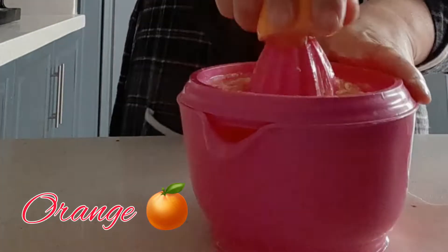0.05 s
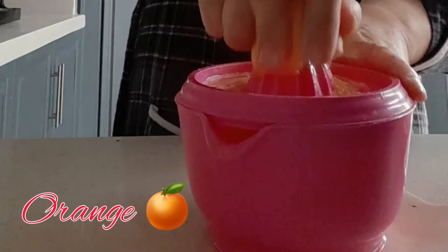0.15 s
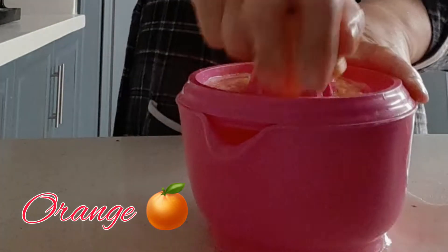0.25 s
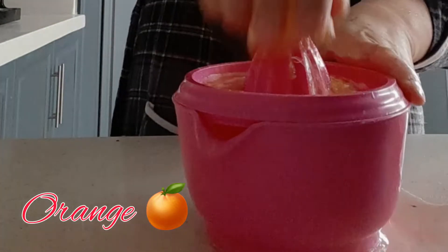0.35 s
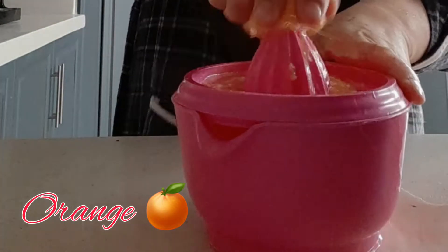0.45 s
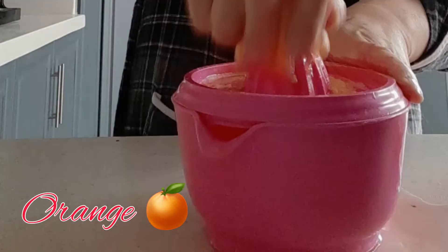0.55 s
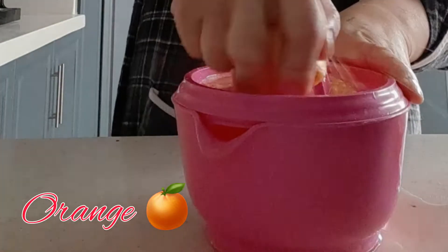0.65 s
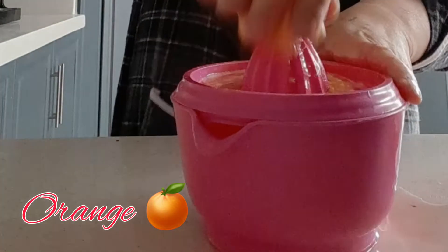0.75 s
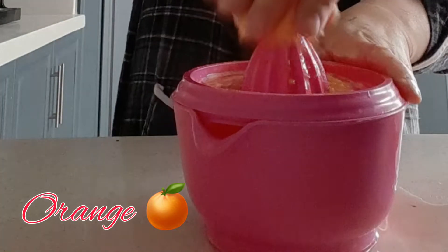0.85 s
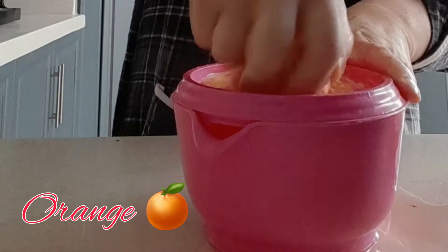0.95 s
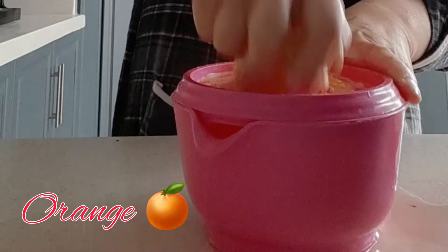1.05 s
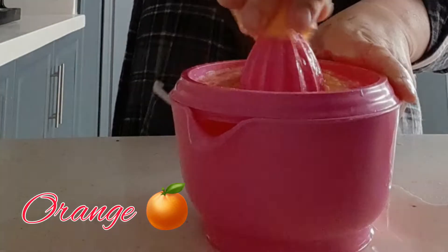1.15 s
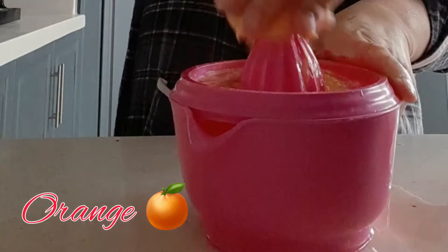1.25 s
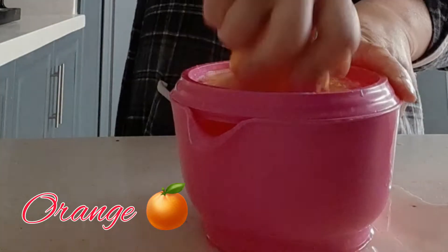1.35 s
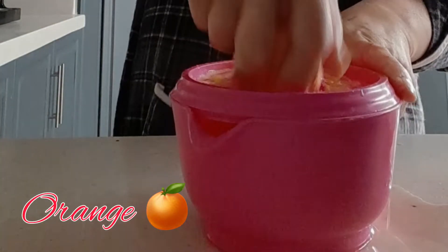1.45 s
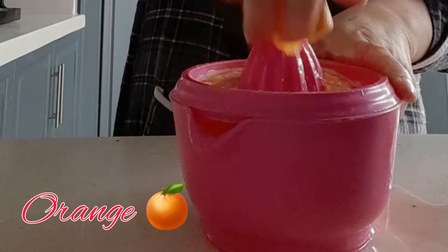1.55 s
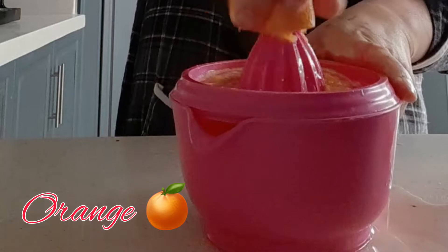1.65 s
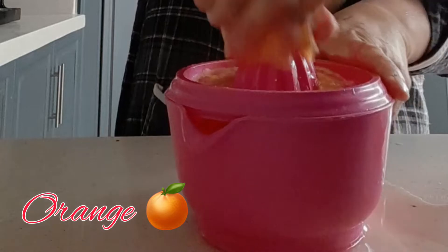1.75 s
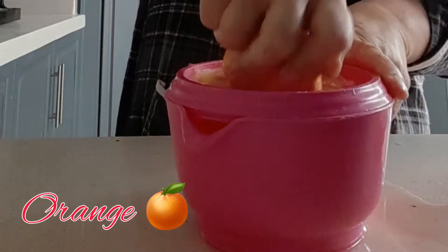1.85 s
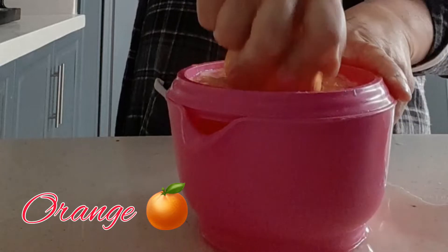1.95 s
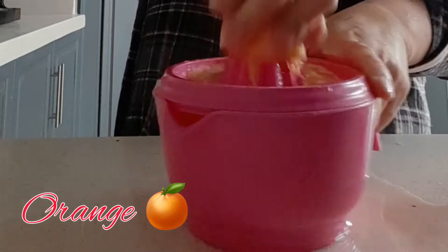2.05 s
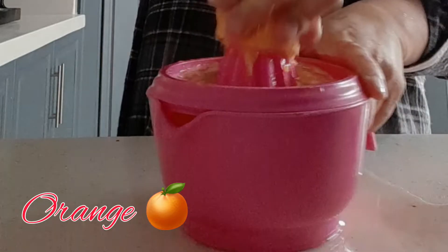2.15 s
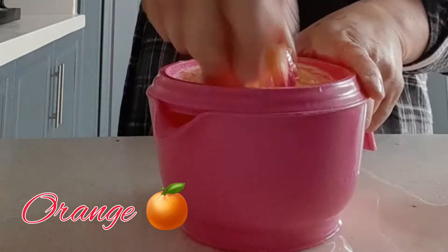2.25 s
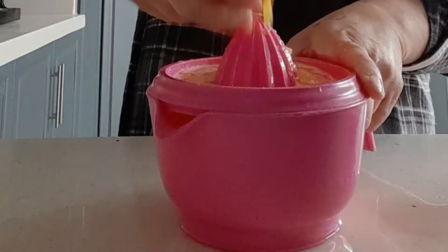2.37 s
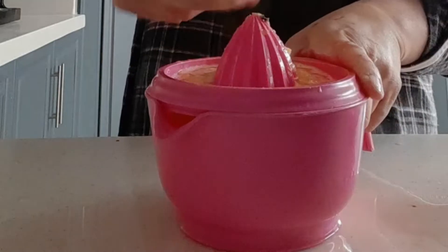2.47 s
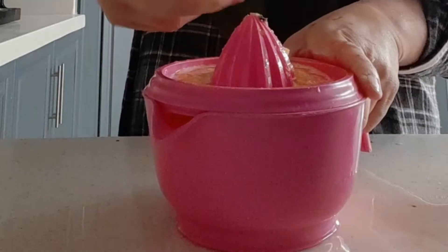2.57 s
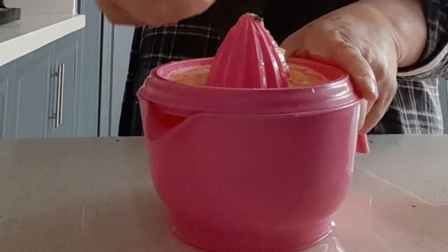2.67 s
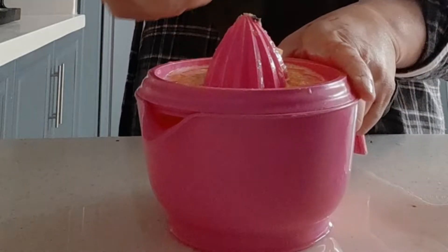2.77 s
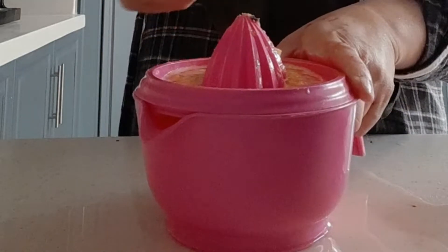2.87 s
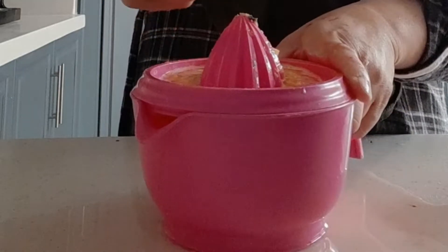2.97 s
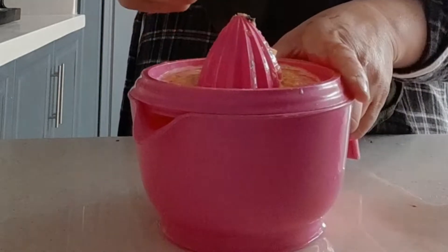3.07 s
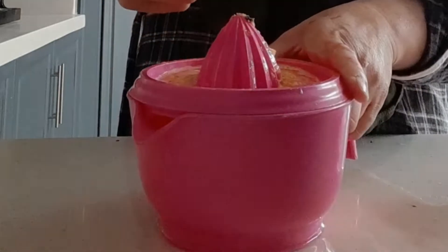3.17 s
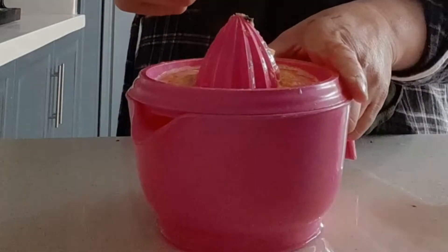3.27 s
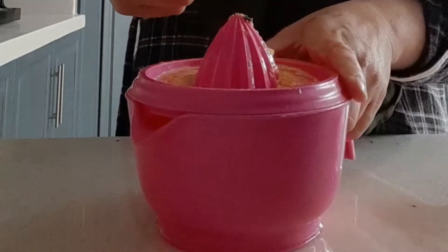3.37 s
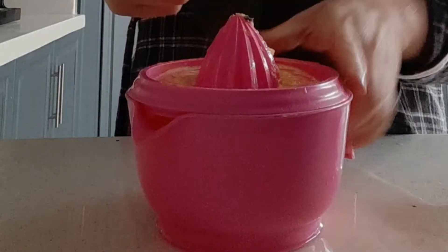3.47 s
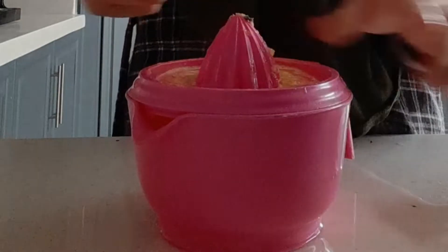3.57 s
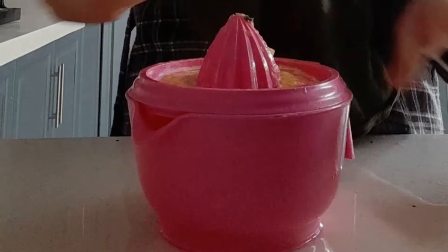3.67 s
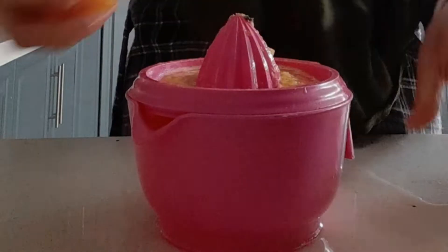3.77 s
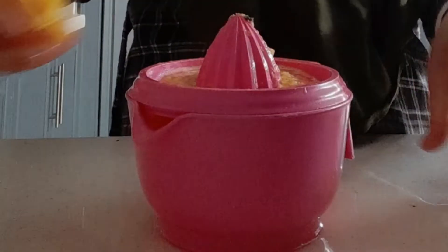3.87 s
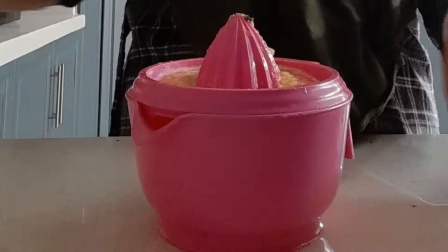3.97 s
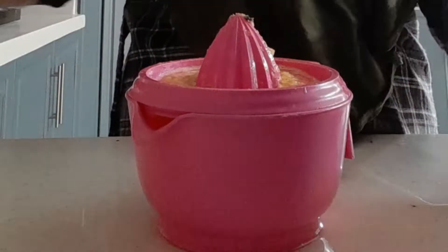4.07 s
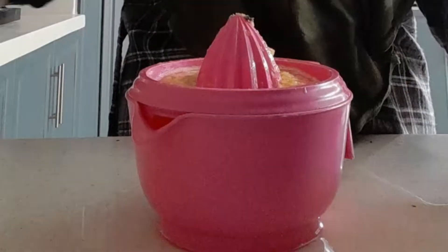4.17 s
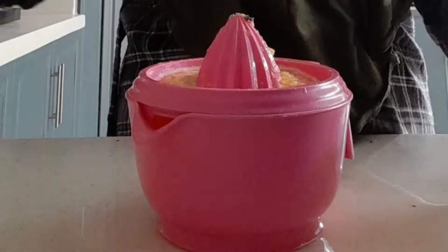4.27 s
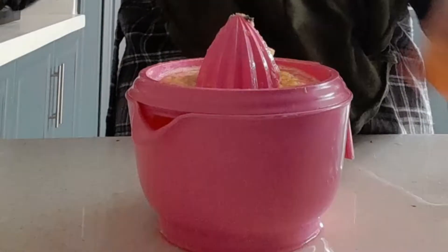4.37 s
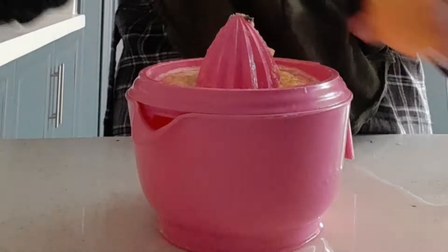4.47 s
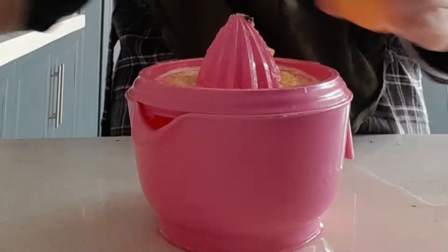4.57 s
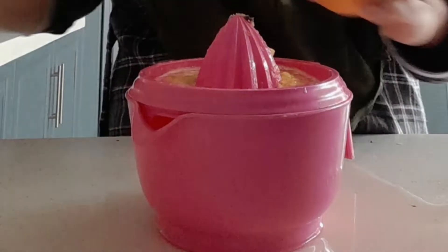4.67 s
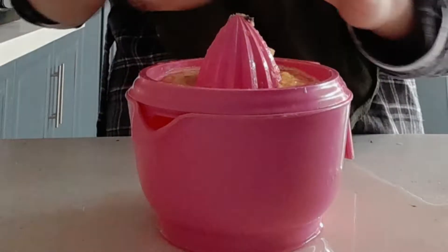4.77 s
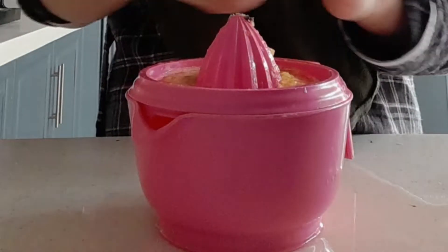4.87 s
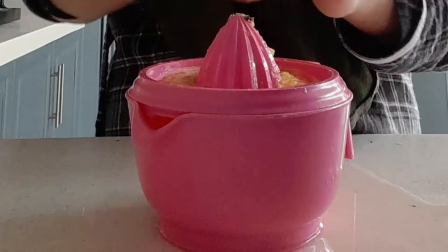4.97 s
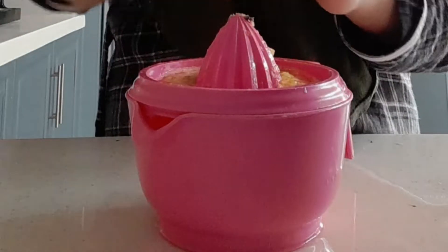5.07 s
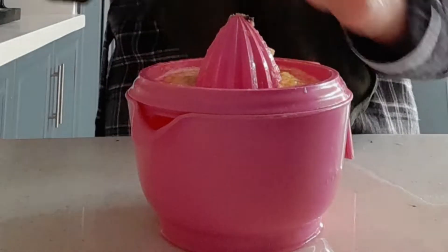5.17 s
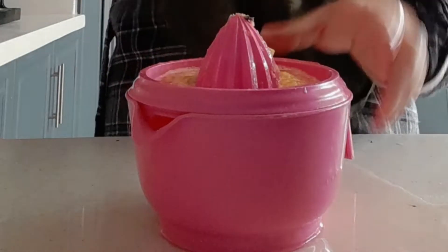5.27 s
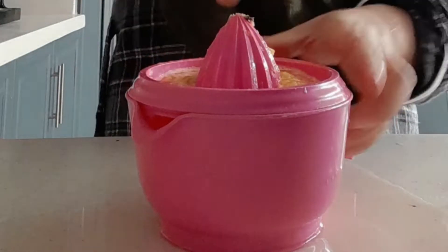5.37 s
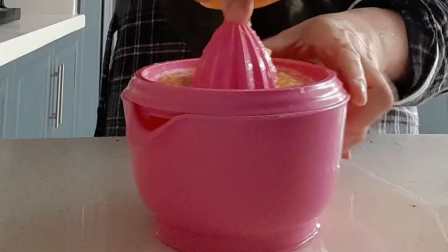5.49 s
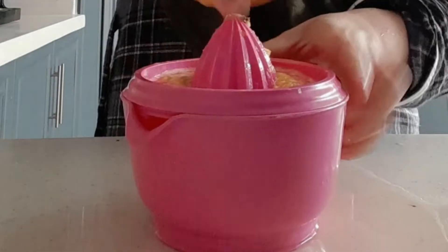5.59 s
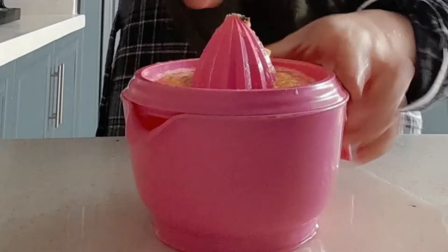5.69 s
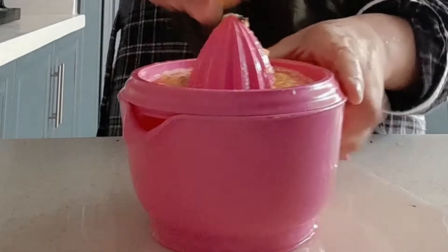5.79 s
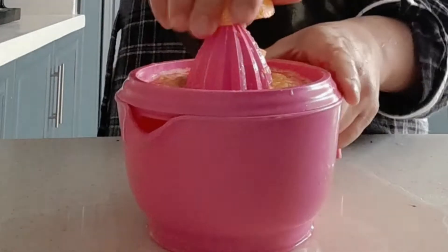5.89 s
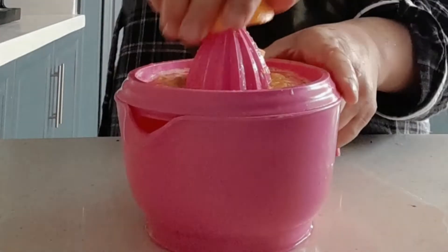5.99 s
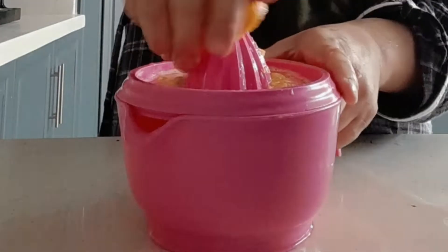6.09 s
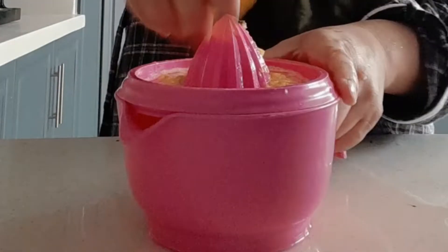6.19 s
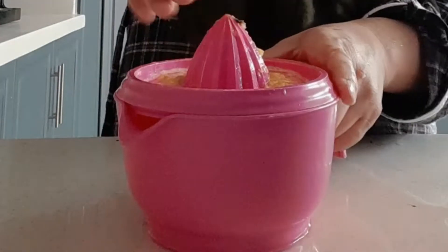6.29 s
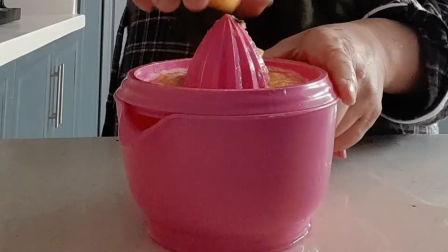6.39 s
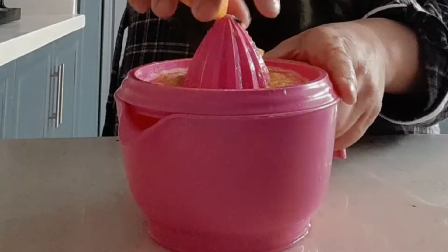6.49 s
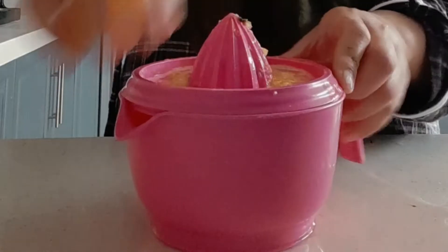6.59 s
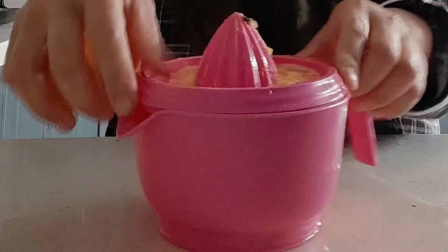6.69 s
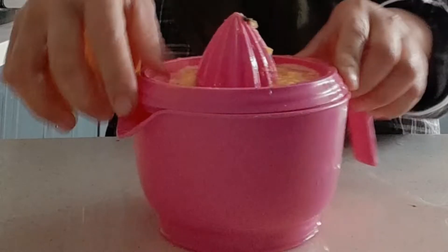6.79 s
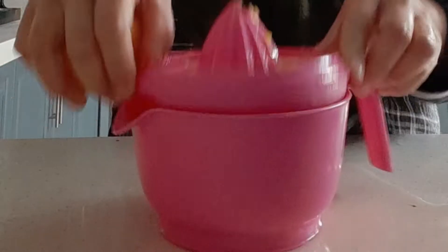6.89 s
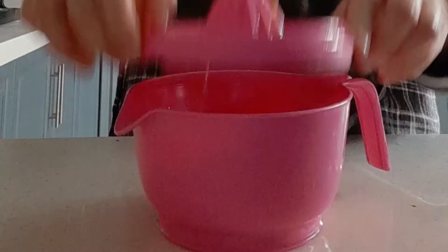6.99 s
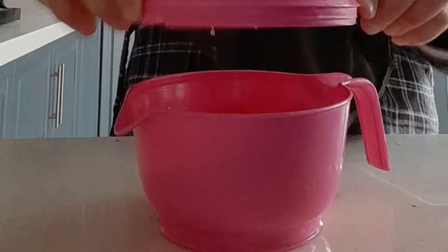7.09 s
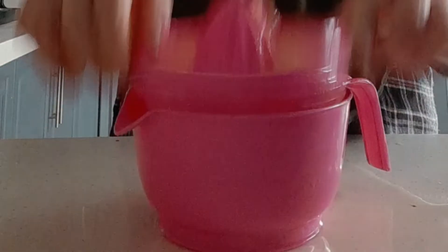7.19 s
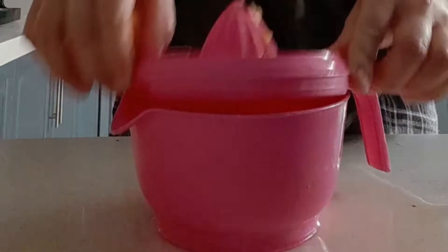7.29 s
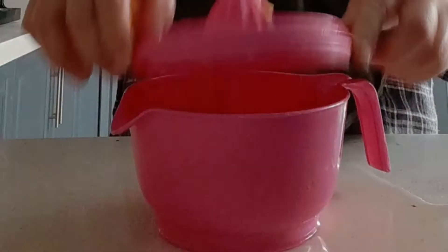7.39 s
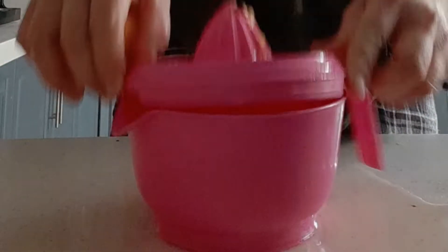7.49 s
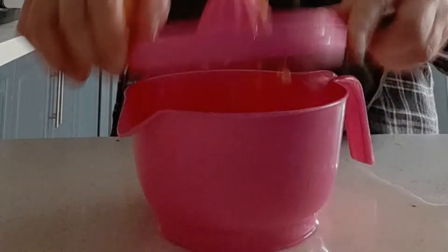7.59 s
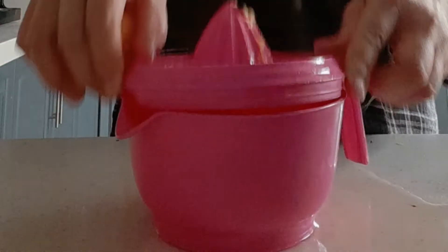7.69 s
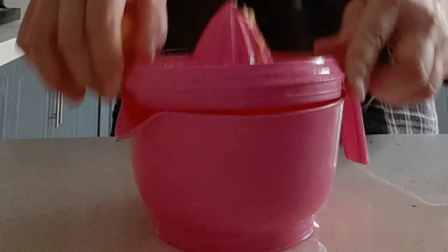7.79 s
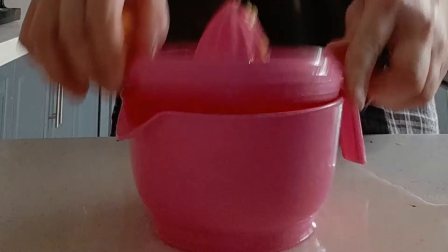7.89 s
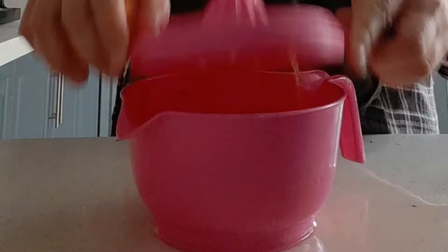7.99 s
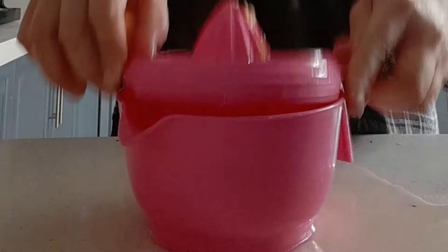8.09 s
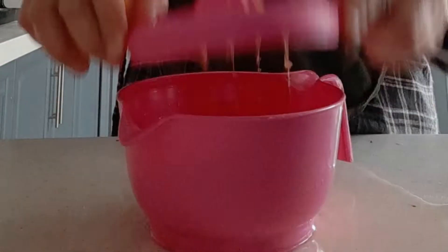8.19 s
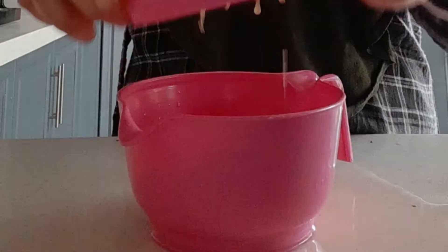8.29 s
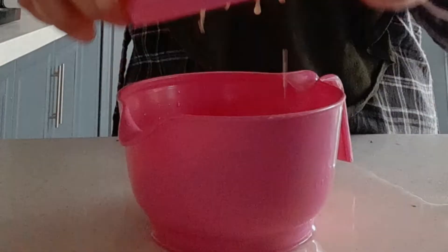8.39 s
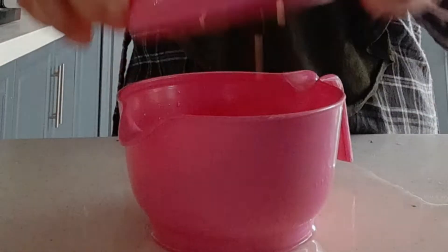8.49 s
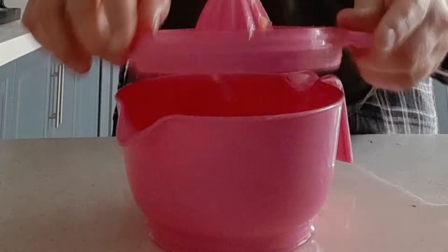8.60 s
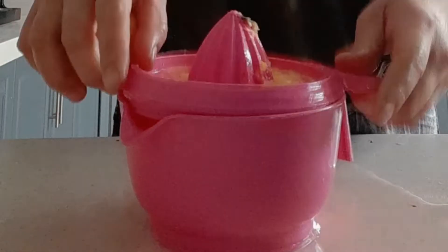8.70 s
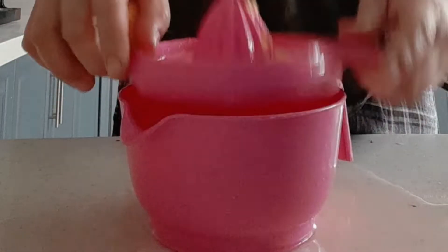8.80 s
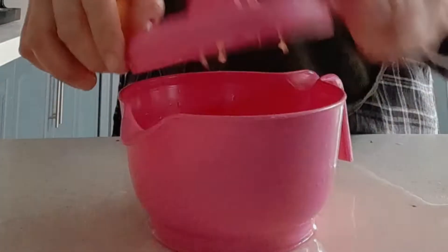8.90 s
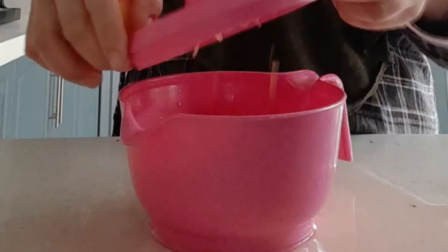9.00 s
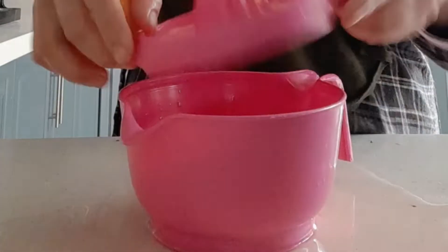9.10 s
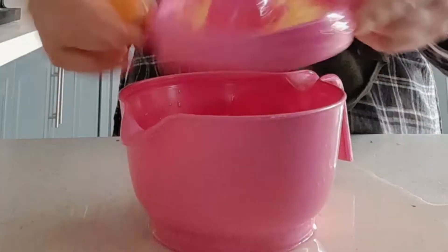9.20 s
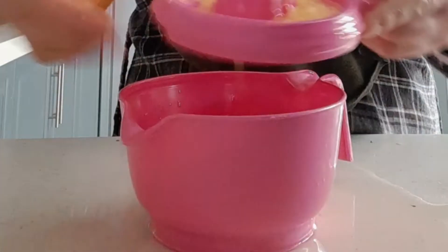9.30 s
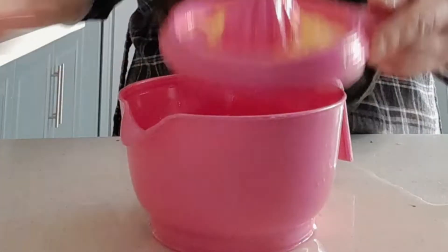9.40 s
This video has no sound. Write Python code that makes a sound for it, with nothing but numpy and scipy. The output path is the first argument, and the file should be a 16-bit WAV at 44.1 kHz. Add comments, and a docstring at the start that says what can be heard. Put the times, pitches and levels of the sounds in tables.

```python
"""A kitchen, heard from close by: the direct sound stands well above the echo of the walls, over an appliance hum.
Citrus halves are twisted by hand on a ribbed plastic juicer: clicks ring the jug, shifting noise squelches.
Juice drips into the jug as short rising sines. A rind drops on the counter as noise and a low thump.
Then the strainer is lifted and knocked on the rim: plastic modes, jug air and shaken pulp."""
import sys
import numpy as np
from scipy import signal
from scipy.fft import rfft, irfft, next_fast_len
from scipy.io import wavfile

SR = 44100
rng = np.random.default_rng(int(sys.argv[2]) if len(sys.argv) > 2 else 0)


def digitize_waveform(pressure):
    """Quantize a signal to 16-bit integers and store it at the path in sys.argv[1].

    Rows of a 2-D input are taken as channels; values are limited to [-1, 1].
    """
    field = np.atleast_2d(pressure).T
    bounded = np.clip(field, -1, 1)
    quanta = np.round(bounded * 32767).astype(np.int16)
    wavfile.write(sys.argv[1], SR, quanta)


N = 416744


def amp(db):
    """Decibels to gain."""
    return 10 ** (np.asarray(db, float) / 20)


def rms_one(x):
    """Scale a sound to rms 1."""
    return x / np.sqrt(np.mean(x ** 2) + 1e-20)


def at_hz(points, hz):
    """Read the second column of a table on a log-frequency axis."""
    table_hz, values = np.transpose(points)
    return np.interp(np.log(hz + 1), np.log(table_hz), values)


def colour(x, spectrum):
    """Filter a sound by a spectrum in dB."""
    size = next_fast_len(len(x) + 4096)
    hz = np.arange(size // 2 + 1) * SR / size
    return irfft(rfft(x, size) * amp(at_hz(spectrum, hz)), size)[:len(x)]


def drift(rate):
    """Random curve through `rate` knots a second, the knots of spread 1 (rate up to 100)."""
    knots = rng.standard_normal(int(N / SR * 100) + 2)
    return np.interp(np.arange(N) / SR * rate, np.arange(len(knots)), knots)


def ring(clicks, hz, t60):
    """A two-pole resonator: a unit click sets a decaying sine of height 1 ringing."""
    radius = amp(-60 / (max(t60, .002) * SR))
    w = 2 * np.pi * hz / SR
    return signal.lfilter([0, np.sin(w)], [1, -2 * radius * np.cos(w), radius * radius], clicks + 1e-18)


def spikes(times, sizes):
    """A click train at given times."""
    out = np.zeros(N)
    np.add.at(out, np.round(np.asarray(times) * SR).astype(int), sizes)
    return out


def grains(per_s, spread_db):
    """Random clicks of either sign, a few much larger than the rest."""
    size_db = spread_db * np.minimum(rng.exponential(1, N), 5)
    sizes = amp(size_db) * rng.choice([-1, 1], N)
    return sizes * (rng.random(N) < per_s / SR)


def burst(times, db, t60, spectrum):
    """A puff of coloured noise that starts at once and dies away."""
    fade = signal.lfilter([1], [1, -amp(-60 / (t60 * SR))], spikes(times, amp(db)) + 1e-18)
    return fade * rms_one(colour(rng.standard_normal(N), spectrum))


def strike(times, db, modes, hardness_db=0., uneven_db=2., detune=0.021):
    """Each blow lands elsewhere, so every mode gets its own strength, sign and shift; hard blows favour high modes."""
    out, t = np.zeros(N + SR // 3), np.arange(SR // 3) / SR
    hz, mode_db, t60 = np.transpose(modes)[:, :, None]
    luck = rng.standard_normal((len(times), 3, len(modes), 1))
    blows = zip(times, db + 0 * times, hardness_db + 0 * times, luck)
    for s, blow_db, tilt_db, (strength, sign, shift) in blows:
        # the tilt, in dB per octave, pivots at 500 Hz
        start_db = blow_db + mode_db + tilt_db * np.log2(hz / 500) + uneven_db * strength
        envelope = amp(start_db - 60 * t / np.maximum(t60, .005))
        rings = np.sign(sign) * envelope * np.sin(2 * np.pi * hz * (1 + detune * shift) * t)
        out[round(s * SR):][:len(t)] += rings.sum(axis=0)
    return out[:N]


def patchy(spectrum, patchy_db, rate):
    """Noise in third-octave bands that swell and sink one by one; rms 1."""
    white, out = rng.standard_normal((2, N)), 0
    for k, hz in enumerate(800 * 2 ** np.arange(0, 3.4, 1 / 3)):
        sos = signal.butter(1, [hz / 1.12, hz * 1.12], "band", fs=SR, output="sos")
        band = signal.sosfilt(sos, white[k % 2])   # neighbours take different noise
        out = out + amp(at_hz(spectrum, hz) + patchy_db * drift(rate)) * band
    return rms_one(out)


# Common level of room air and hum through the take: t/s, level/dB
BACKGROUND_LEVEL = [(0.0, -31.5), (0.76, -38), (1.58, -39), (2.05, -35), (2.58, -39.5), (3.21, -37.5),
                    (4.8, -38), (6.74, -36), (7.63, -40.5), (8.47, -45), (9.45, -42.5)]
# Spectrum of the room air: f/Hz, relative level/dB per Hz
AIR_SPECTRUM = [(25, -32), (55, -17), (80, -38), (125, 5.5), (250, -11), (450, -9), (800, -19), (1500, -28),
                (3000, -33.5), (5000, -34.5), (16000, -33.5)]
# Narrow bands of the appliance hum: f/Hz, width/Hz, relative level/dB
HUM_BANDS = [(54.95, 3, -45.5), (125.1, 7.2, -41), (178.1, 6.5, -45.5), (238, 4.4, -51), (343.4, 28, -48.5),
             (459, 7.1, -51.5), (1607, 36, -65.5), (2597, 39, -66.5), (4800, 250, -73.5)]


def background():
    """Across the kitchen: broad room air, and noise in narrow resonances whose randomness makes the hum waver."""
    hum_gain_db = 43.5   # raises all the hum bands together
    air = amp(0.36 * drift(3.0)) * rms_one(colour(rng.standard_normal(N), AIR_SPECTRUM))
    hum = 0
    for hz, width, db in HUM_BANDS:
        t60 = np.log(1000) / (np.pi * width)   # a narrower band rings longer
        hum = hum + amp(db + hum_gain_db) * rms_one(ring(rng.standard_normal(N), hz, t60))
    s, level_db = np.transpose(BACKGROUND_LEVEL)
    return amp(np.interp(np.arange(N) / SR, s, level_db)) * (air + hum)


# Decay of the kitchen's echo: f/Hz, t60/s
KITCHEN_DECAY = [(100, 0.95), (500, 0.74), (2000, 0.75), (5000, 0.62), (12000, 0.19)]


def kitchen(x):
    """Diffuse echo of the room: octave bands of noise, each dying at its own rate."""
    t, tail = np.arange(SR) / SR, 0
    for hz in 63 * 2. ** np.arange(8):
        sos = signal.butter(2, [hz / np.sqrt(2), hz * np.sqrt(2)], "band", fs=SR, output="sos")
        fade = amp(-60 * t / at_hz(KITCHEN_DECAY, hz))
        tail = tail + signal.sosfilt(sos, rng.standard_normal(SR)) * fade
    top = signal.butter(2, 11400, "high", fs=SR, output="sos")   # above the octave bands
    tail = tail + signal.sosfilt(top, rng.standard_normal(SR)) * amp(-60 * t / KITCHEN_DECAY[-1][1])
    tail = tail * np.clip(t / 0.0013, 0, 1)   # a short rise, s
    return signal.fftconvolve(x, tail / np.sqrt(np.sum(tail ** 2)))[:N]


# Modes of the counter top: f/Hz, level/dB, t60/s
COUNTER_MODES = [(47, -4, 0.083), (93, -2.5, 0.19), (170, -6, 0.032)]


def thump(times, db):
    """The weight behind a blow reaches the counter 12 ms later, softly: low modes through a gentle low-pass."""
    knock = strike(times + 0.01203, db, COUNTER_MODES, uneven_db=4.0)
    return signal.lfilter([.03], [1, -.97], knock)


# Slap of the rind's skin: f/Hz, relative level/dB per Hz
RIND_SPECTRUM = [(200, -1.5), (330, 11), (600, 1), (1000, -8.5), (1500, -1), (2000, -16), (2900, -28),
                 (4000, -22), (5400, -12.5), (16000, -25.5)]
# Bright spray, for the rind, the knocks and the twisting: f/Hz, relative level/dB per Hz
SPRAY_SPECTRUM = [(4000, -14.5), (6000, 4), (9000, 0), (16000, -3)]


def rind():
    """On the counter: a tick, a dense slap of the skin, then the weight behind it thumps."""
    s, db = np.array([4.424]), -5.5
    tick = burst(s - .002, db - 22, 0.045, SPRAY_SPECTRUM)
    slap = burst(s + 0.0018, db - 3, 0.09, RIND_SPECTRUM)
    return tick + slap + thump(s + .003, db + 3.5)


# Drops and bursting juice cells: t/s, level/dB, nominal pitch f/Hz
DRIP_EVENTS = [(0.519, -24, 2350), (0.7259, -19, 4680), (0.7752, -14, 4470), (0.9315, -22.5, 2490),
               (1.1797, -23, 4660), (1.3518, -23.5, 4440), (1.5213, -31, 3860), (1.616, -29, 2810),
               (1.807, -22, 4200), (2.4095, -33, 3530), (2.4676, -39, 5140), (2.5716, -28, 4040),
               (2.6696, -33, 4640), (2.6915, -30, 4300), (2.7848, -32, 2180), (2.8593, -36, 4840),
               (2.8733, -34, 3330), (3.042, -39, 3580), (3.084, -31, 5400), (3.2263, -29, 2410),
               (3.4136, -48, 4700), (3.701, -33.5, 4730), (3.775, -31, 3120), (5.6203, -33, 4130),
               (5.7624, -32, 3980), (6.5564, -32.5, 3340), (7.6425, -31, 3100), (8.284, -27, 2350),
               (8.3205, -31, 2410), (8.3744, -23.5, 5300), (9.149, -28.5, 4600)]


def drips():
    """In the jug: each drop traps a bubble that rings briefly and rises in pitch, with a broad tick of like colour."""
    out, t = np.zeros(N + 2000), np.arange(2000) / SR
    for s, db, hz in DRIP_EVENTS:
        fade = amp(-60 * t * hz / 93)   # down 60 dB in about 93 cycles
        bubble = fade * np.sin(2 * np.pi * hz * (1.007 * t + 0.42 * t * t))
        short_tone = np.sin(2 * np.pi * hz * t[:16]) / 3
        tick_noise = np.convolve(rng.standard_normal(2000), short_tone)[:2000]
        tick = amp(-4 - 60 * t / .018) * tick_noise
        out[round(s * SR):][:2000] += amp(db) * (bubble + tick)
    return out[:N]


# Strainer on the rim, with its bounces:
# t/s, level/dB, crack level/dB, shaken pulp level/dB, jug air f/Hz, jug air level/dB
TAP_EVENTS = [(7.274, -13.5, -4, -34, 684, -12.5), (7.291, -11, -21, -38, 671, -12.5),
              (7.301, -13, -7.5, -34.5, 688, -18.5), (7.313, -13.5, -44, -40.5, 665, -28),
              (7.501, -12, -4.5, -24.5, 669.6, -10), (7.515, -15, -9, -27.5, 564, -17),
              (7.532, -5, -14.5, -48, 652, -12.5), (7.705, -22, -3, -19.5, 678.6, -14),
              (7.724, -12.5, -28, -25, 661, -24), (7.908, -21, -6.5, -24, 614, -21),
              (7.924, -14, -26, -19.5, 590, -16), (8.11, -9.5, -8.5, -32, 644.7, -12),
              (8.138, -14.5, -26.5, -50, 592.5, -24.5), (8.542, -13, -12.5, -29.5, 656, -21),
              (8.601, -12.5, -30, -63, 619, -23.5), (8.739, -17, -11, -20.5, 590, -47),
              (8.752, -10, -4.5, -24.5, 578, -36), (8.84, -32, -33, -57, 686, -50)]
# Modes of the plastic strainer: f/Hz, level/dB, t60/s
STRAINER_MODES = [(150, -11, 0.45), (293.3, 0.5, 0.15), (351, -13.5, 0.16), (441, -3, 0.15),
                  (540, -4, 0.086), (596, -1.5, 0.12), (688.6, 0, 0.046), (772, -15, 0.082),
                  (865, -7, 0.048), (933, -5.5, 0.057), (1077, -12, 0.056), (1227, -16, 0.095),
                  (1728, -12.5, 0.078), (4720, -28.5, 0.049)]
# Shaken pulp: f/Hz, relative level/dB per Hz
PULP_SPECTRUM = [(700, 12), (1700, 2), (3000, -1), (4200, 1.5), (5500, -4.5), (12000, -12.5)]
# Sharp crack, also the wet slap of the bumps and the crackle of the twisting: f/Hz, relative level/dB per Hz
CRACK_SPECTRUM = [(600, 3.5), (1200, -0.5), (2000, 2), (3000, 2.5), (4800, 3), (8000, -4.5), (16000, -11)]


def taps():
    """On the rim: hard plastic on plastic rings the strainer, cracks, shakes the pulp and sounds the jug's air,
    whose pitch depends on how far the strainer closes it."""
    s, db, crack_db, pulp_db, air_hz, air_db = np.transpose(TAP_EVENTS)
    hardness_db = 2.5 + 0.1 * (crack_db - db)   # dB per octave; a louder crack means a harder knock
    ringing = strike(s, db, STRAINER_MODES, hardness_db, uneven_db=1.5, detune=0.017)
    air = 0
    for k, hz in enumerate(air_hz):
        air_modes = [(hz, -3, .55), (1.04 * hz, -3, .25), (.96 * hz, -3, .25)]
        air = air + strike(s[k:k + 1], air_db[k], air_modes, uneven_db=2.0, detune=0.0103)
    crack = burst(s, crack_db, 0.063, CRACK_SPECTRUM)
    crack = crack + burst(s, crack_db - 10.0, 0.035, SPRAY_SPECTRUM)
    pulp = burst(s, pulp_db, 0.5, PULP_SPECTRUM) * amp(2 * drift(83.0))
    sloshing = amp(3.5 * drift(45.))   # wet pulp damps the rings unevenly
    return sloshing * (ringing + air) + crack + pulp + thump(s, db - 8.5)


# Cone ribs and hands bump the jug: t/s, level/dB, hardness/dB per octave, wet slap level/dB
BUMP_EVENTS = [(0.064, -20.5, 0, -19), (0.265, -27, 12.5, -28), (0.322, -16, 6, -23),
               (0.3929, -1.5, 6, -19), (0.536, -19, 4.5, -37), (0.877, -21, -3, -50),
               (1.035, -21, 4.5, -38), (1.102, -32, 4, -18.5), (1.284, -33, -1, -21), (1.439, -21, -1, -32),
               (1.731, -21, 7, -36), (1.959, -17, 7.5, -29.5), (2.005, -19, -2, -40),
               (2.034, -5.5, 1, -9.5), (2.201, -15, 0.5, -15), (2.32, -36, -8, -20), (2.55, -23, -3, -27.5),
               (2.94, -26, -8, -50), (5.549, -26.5, -3, -35), (5.865, -20.5, 5, -29),
               (6.087, -19.5, -4.5, -21), (6.505, -18.5, 4, -44), (6.534, -21.5, 4, -34),
               (6.922, -15.5, 1, -50), (6.984, -15.5, 2.5, -45)]
# The jug rocks and its foot lands on the counter: t/s, level/dB
ROCK_EVENTS = [(2.003, -11), (2.034, -4.5), (6.505, -14), (6.533, -16)]
# Modes of the jug, also shaken by the twisting: f/Hz, level/dB, t60/s
JUG_MODES = [(222, -21, 0.012), (312.5, -1, 0.18), (383.3, 1, 0.09), (441.4, -2.5, .1), (554, -8, 0.042),
             (664, -21.5, 0.024), (697, -9, 0.041), (865, -10, 0.027), (978, -8, 0.012), (1231, -17, 0.04),
             (1620, -26.5, 0.091)]


def bumps():
    """At the juicer: dull blows ring the jug with a wet slap on top and thump the counter through its foot."""
    s, db, hardness_db, slap_db = np.transpose(BUMP_EVENTS)
    blows = strike(s, db, JUG_MODES, hardness_db, uneven_db=3.0)
    slaps = burst(s, slap_db, 0.032, CRACK_SPECTRUM)
    return blows + slaps + thump(s, db - 14) + thump(*np.transpose(ROCK_EVENTS))


# Each twist or touch of the hands: t/s at the top of its rise, hold/s,
# then level/dB of the drag on the jug, rub of the rind, wet squelch, fine spray
STROKE_EVENTS = [(0.0, 0.015, -24, -23.5, -39, -49), (0.031, 0.053, -24.5, -36, -33, -25),
                 (0.151, 0.12, -18.5, -32, -33.5, -26.5), (0.269, 0.058, -23.5, -28.5, -37.5, -44),
                 (0.386, 0.012, -28, -22.5, -27.5, -16.5), (0.416, 0.054, -17, -25.5, -37.5, -24.5),
                 (0.532, .13, -17, -36.5, -34.5, -34), (0.725, 0.025, -27, -42, -30.5, -34),
                 (0.763, .04, -27, -54, -40.5, -29), (0.893, 0.097, -20, -36.5, -30, -26.5),
                 (1.096, 0.075, -22, -43, -32, -27), (1.281, 0.024, -16, -56, -27, -18),
                 (1.322, 0.058, -41, -58, -38, -28), (1.726, 0.044, -21.5, -36, -32, -32.5),
                 (1.805, 0.026, -27.5, -55, -26.5, -25.5), (1.892, 0.023, -25, -31, -33.5, -36),
                 (2.011, 0.047, -25, -23.5, -23.5, -22), (2.07, 0.084, -21, -36, -38.5, -35),
                 (2.18, 0.067, -20.5, -37, -29, -21.5), (2.312, 0.025, -26, -49, -48, -51),
                 (2.548, 0.065, -34.5, -47, -44.5, -55), (2.647, 0.15, -34.5, -40.5, -44, -49),
                 (2.935, .15, -30.5, -45.5, -48, -57), (3.428, 0.061, -30, -43, -43, -44),
                 (3.66, 0.056, -40, -46, -54, -52), (4.94, .3, -45, -51, -55, -67),
                 (5.528, 0.039, -26, -35, -44, -61), (5.761, 0.045, -29.5, -41, -44.5, -59),
                 (5.852, 0.02, -20.5, -35.5, -39, -53), (5.985, 0.043, -29, -40, -46.5, -42.5),
                 (6.09, 0.078, -35.5, -41.5, -44.5, -49), (6.207, 0.046, -33.5, -44.5, -65, -58),
                 (6.419, 0.042, -28, -43, -62, -60), (6.511, 0.076, -24, -37.5, -46, -50),
                 (6.59, 0.098, -42, -40, -45, -57), (6.736, 0.047, -27.5, -34.5, -38, -53),
                 (6.842, .07, -32.5, -33.5, -42, -47), (6.932, 0.074, -41, -32, -40.5, -54)]
# Rise into a stroke, and extra fall after its hold; columns drag, rub, squelch, spray [dB/s]
ATTACK_RATES = [900, 900, 610, 700]
RELEASE_RATES = [400, 355, 424, 453]


def strokes():
    """Gain of drag, rub, squelch and spray: every stroke rises fast, sags while it holds, then lets go."""
    sag_db_per_s = 35.5
    t, power = np.arange(0, N, 32) / SR, 0   # one value every 32 samples
    for s, hold_s, *db in STROKE_EVENTS:
        rise_db = np.outer(ATTACK_RATES, np.minimum(t - s, 0))
        sag_db = sag_db_per_s * np.maximum(t - s, 0)
        fall_db = np.outer(RELEASE_RATES, np.maximum(t - s - hold_s, 0))
        level_db = np.array(db)[:, None] + rise_db - sag_db - fall_db
        power = power + amp(np.maximum(level_db, -150)) ** 2
    return [np.interp(np.arange(N) / SR, t, np.sqrt(p)) for p in power]


# Wet hiss of the squelch: f/Hz, relative level/dB
SQUELCH_SPECTRUM = [(600, -24), (1100, -9.5), (1600, -20), (2400, 7.5), (3400, -12.5), (4600, 12.5),
                    (6000, -14), (9000, -19.5)]


def twisting():
    """At the cone: ribs judder through the pulp and shake the jug; juice cells burst and crackle in a wet hiss."""
    drag_gain, rub_gain, wet_gain, spray_gain = strokes()
    shaken = [amp(db) * ring(grains(per_s=330.0, spread_db=3.5), hz, t60) for hz, db, t60 in JUG_MODES]
    drag = rms_one(sum(shaken[:4]))   # the low jug modes
    rub = rms_one(sum(shaken[4:]))    # the higher ones
    cells = 0
    for hz in np.geomspace(1500, 6000, num=9):
        cells = cells + ring(grains(per_s=35., spread_db=3.5), hz, 30. / hz)
    crackle = colour(grains(per_s=250., spread_db=4.5), CRACK_SPECTRUM)
    grain = amp(-4) * rms_one(cells) + amp(-7) * rms_one(crackle)
    hiss = patchy(SQUELCH_SPECTRUM, patchy_db=8.0, rate=21.0)
    spray = rms_one(colour(grains(per_s=2500., spread_db=3.5), SPRAY_SPECTRUM))
    flutter = amp(4.5 * drift(70.))   # shared by hiss and spray
    squelch = grain + flutter * amp(-1.5) * hiss
    return drag_gain * drag + rub_gain * rub + wet_gain * squelch + spray_gain * flutter * spray


def scene():
    """Juicer, counter, their echo and the background; drops inside the jug reach the walls weakly."""
    near = twisting() + bumps() + taps() + rind()
    drops = drips()
    echo = amp(-15.5) * kitchen(near + drops / 3)
    return (near + drops + echo + background())[None]


# Response of the microphone: f/Hz, level/dB
MICROPHONE_RESPONSE = [(22, -28), (40, -4), (4800, -1.5), (5600, -7.5), (6600, -20), (8200, -31),
                       (10000, -20.5), (12000, -14), (16000, -13.5)]


def record(dry):
    """Microphone colour, peaks rounded off under full scale, steep top cut."""
    heard = colour(dry[0], MICROPHONE_RESPONSE)
    heard = heard / (1 + np.abs(heard) ** 8) ** (1 / 8)
    top_cut = signal.cheby2(14, 70, 16700, fs=SR, output="sos")   # 70 dB down from 16700 Hz
    return signal.sosfilt(top_cut, heard)[None]


dry = scene()
out = record(dry)
digitize_waveform(out)
```